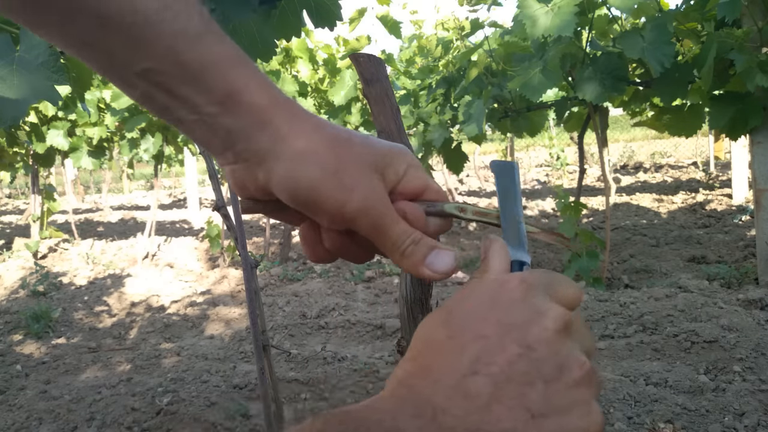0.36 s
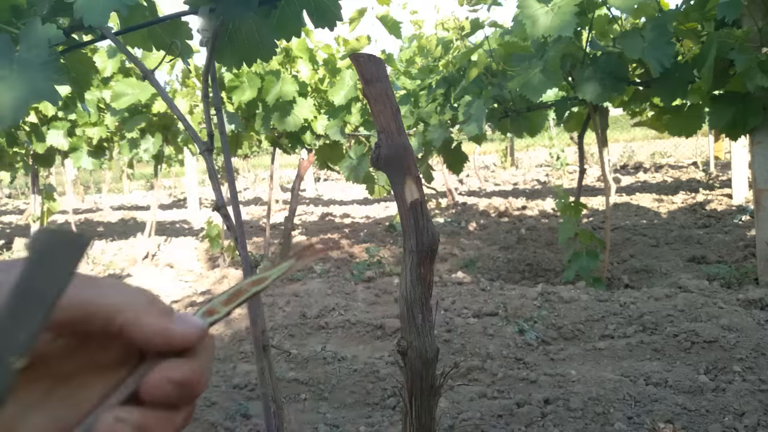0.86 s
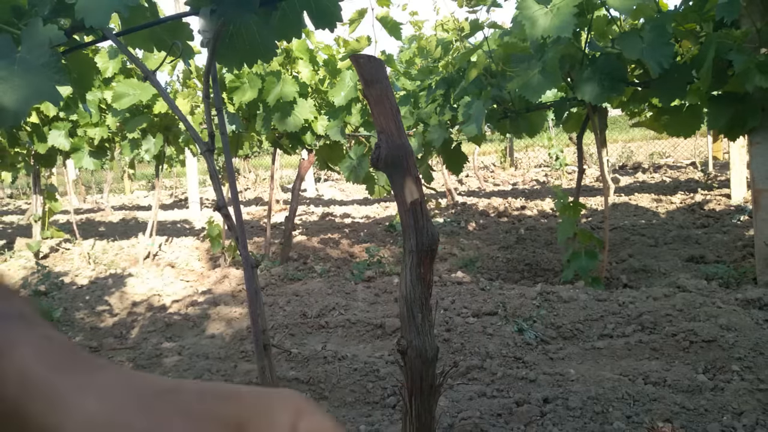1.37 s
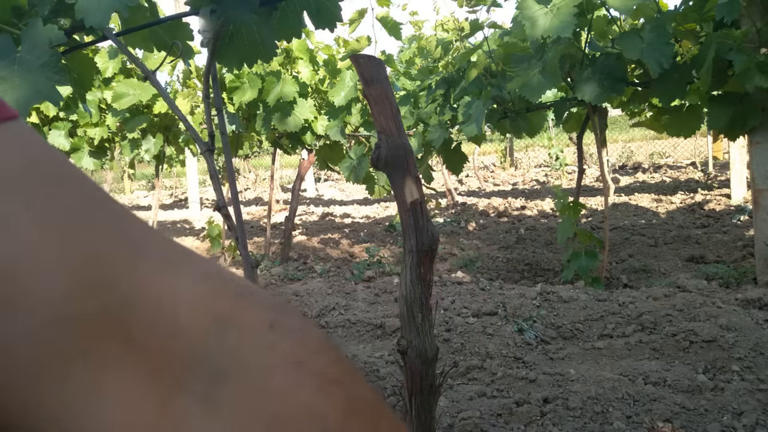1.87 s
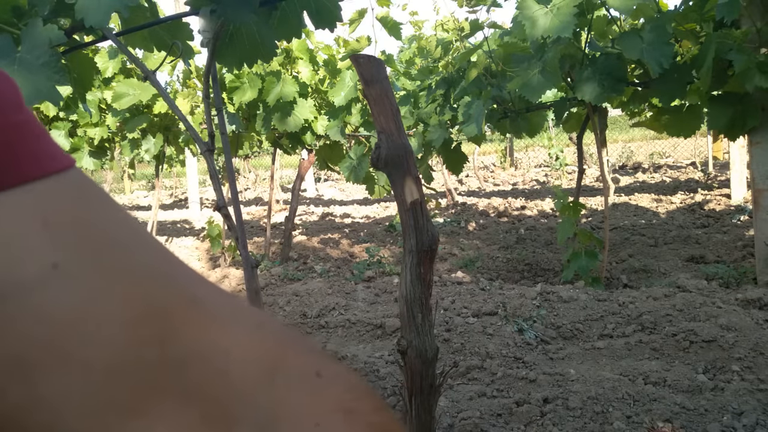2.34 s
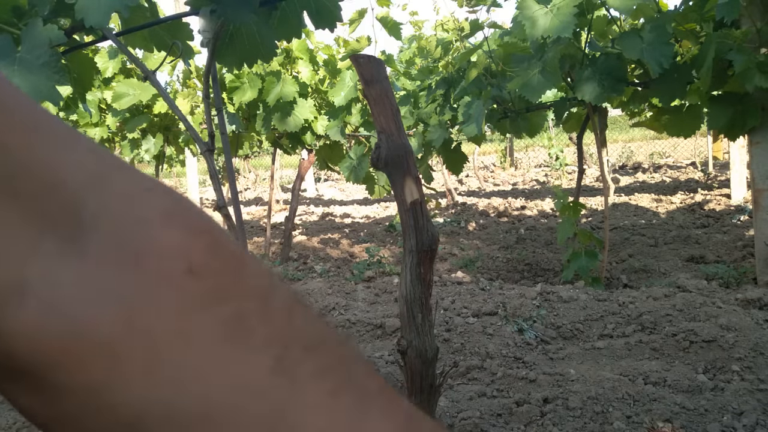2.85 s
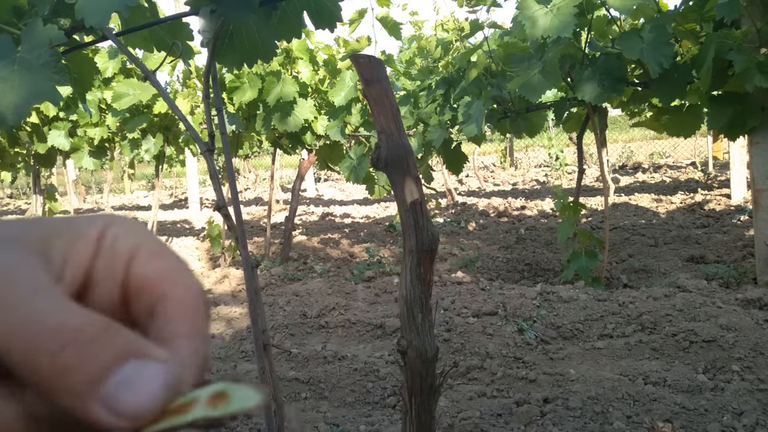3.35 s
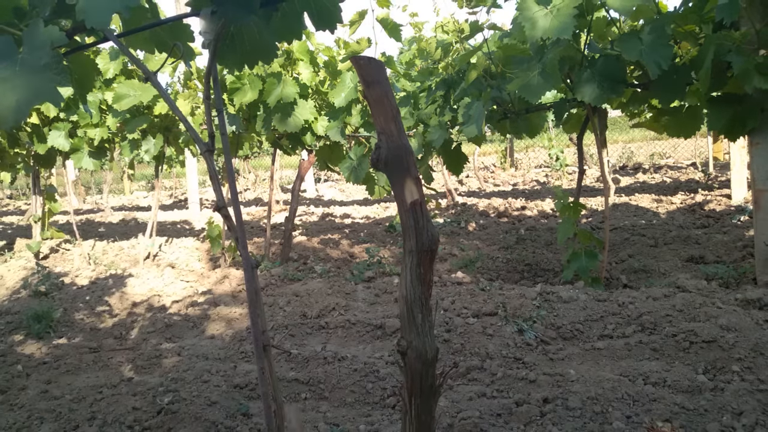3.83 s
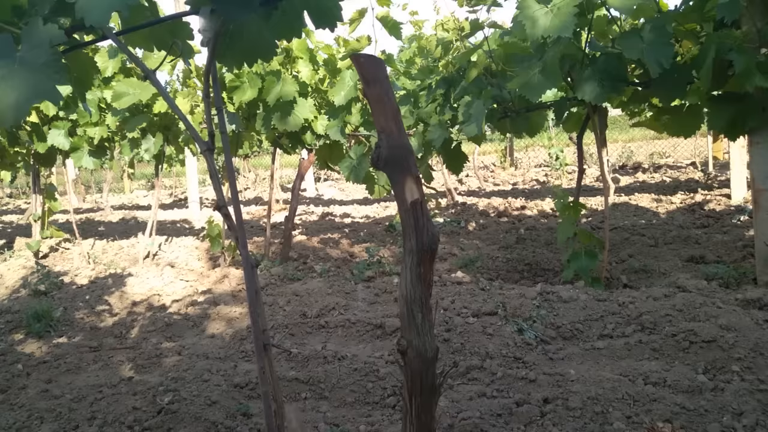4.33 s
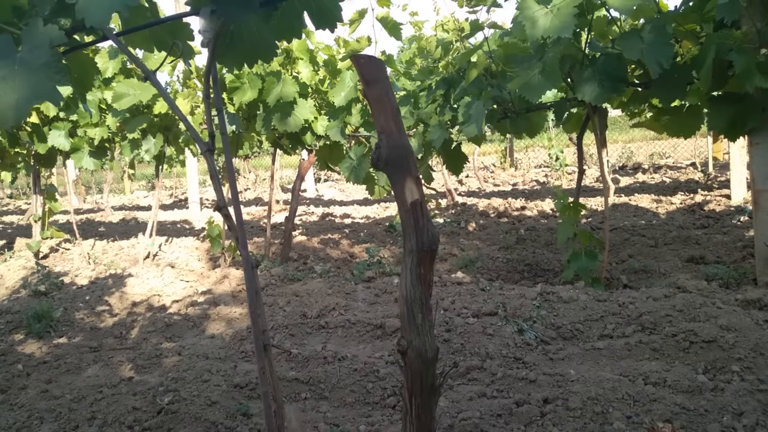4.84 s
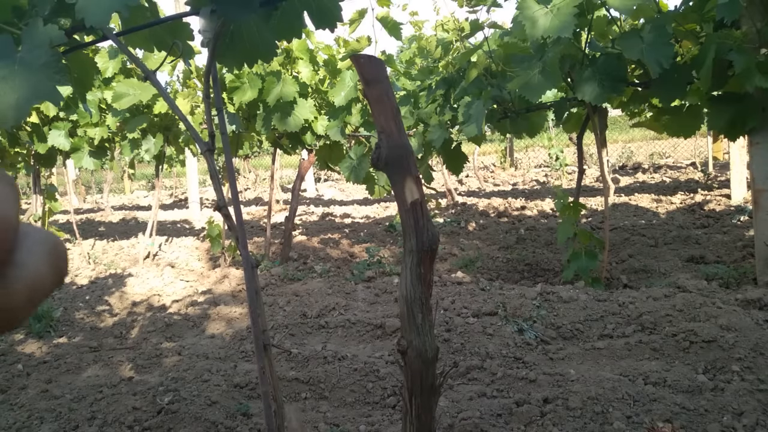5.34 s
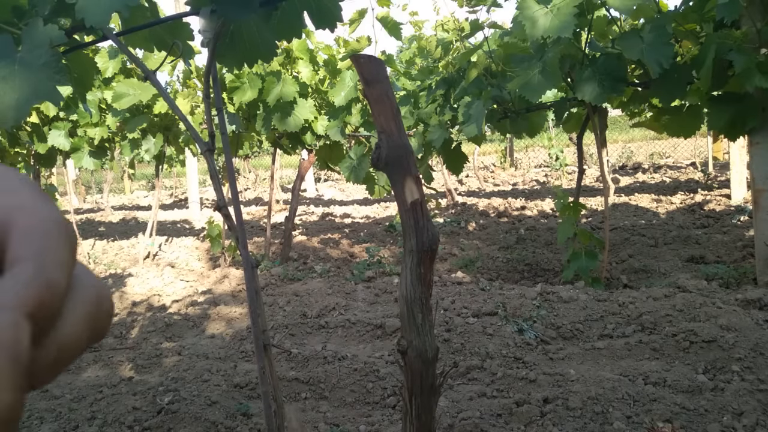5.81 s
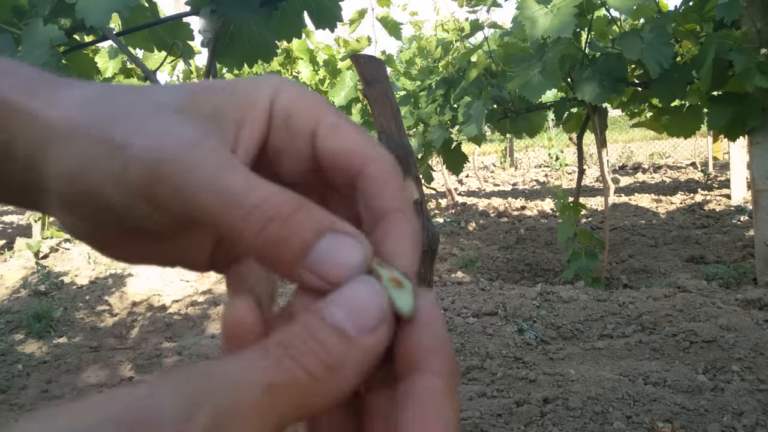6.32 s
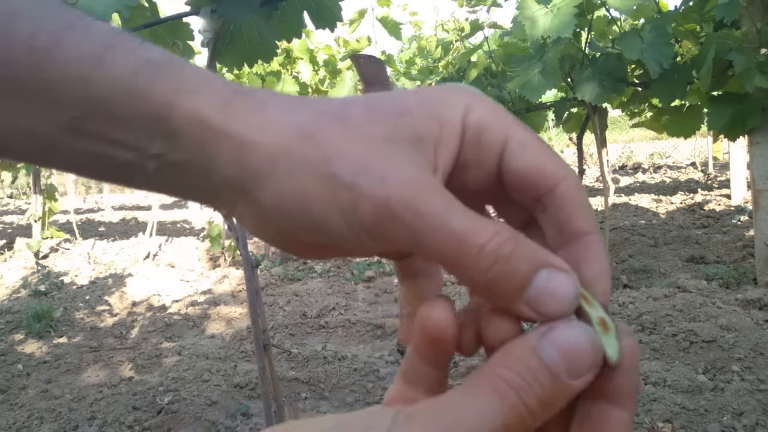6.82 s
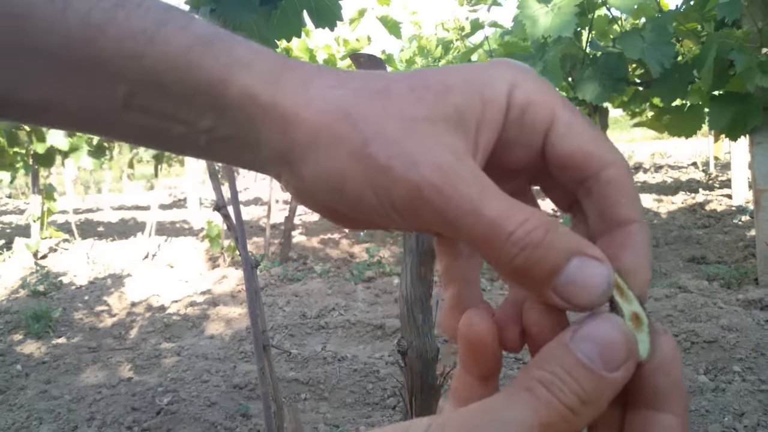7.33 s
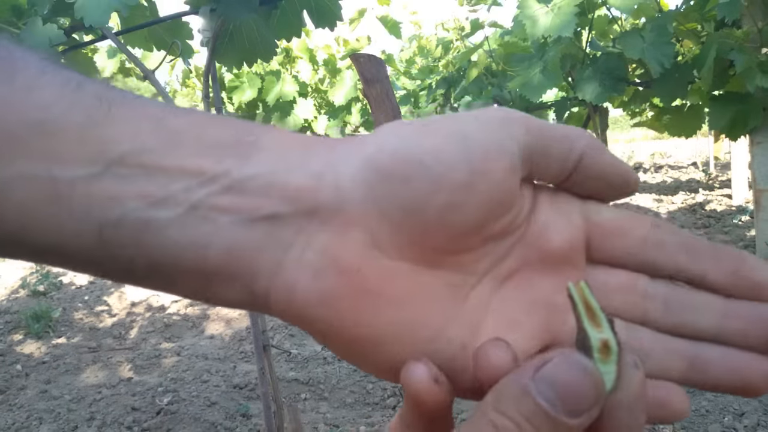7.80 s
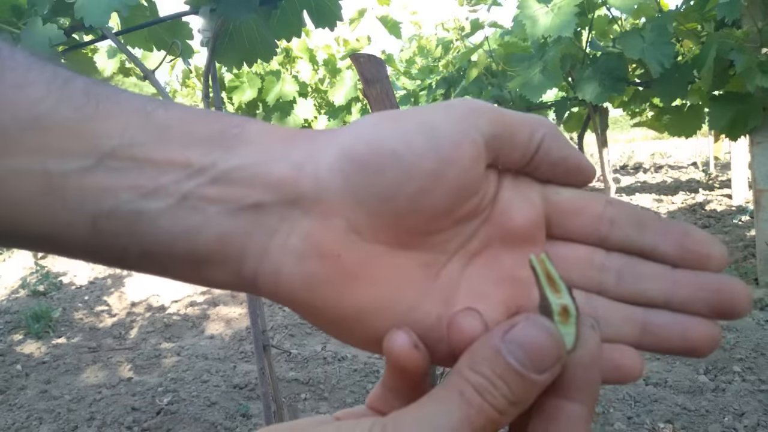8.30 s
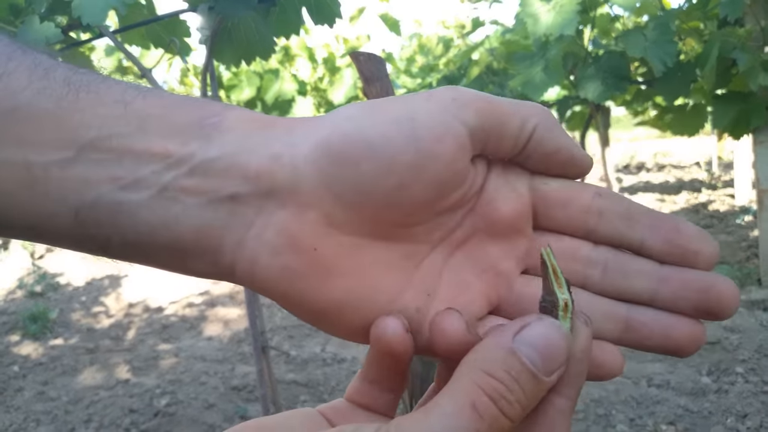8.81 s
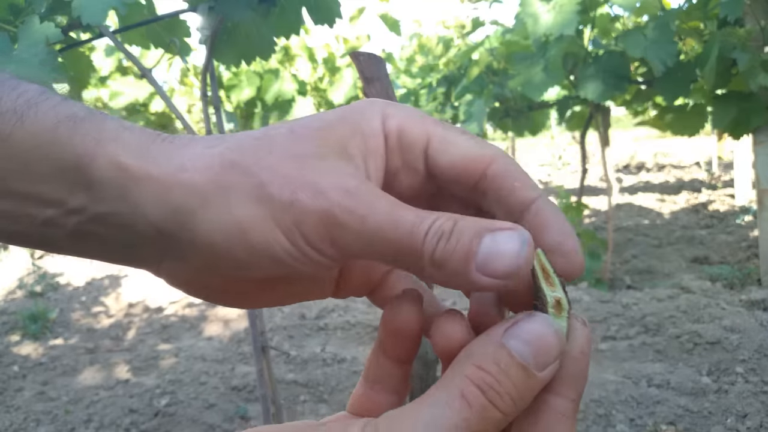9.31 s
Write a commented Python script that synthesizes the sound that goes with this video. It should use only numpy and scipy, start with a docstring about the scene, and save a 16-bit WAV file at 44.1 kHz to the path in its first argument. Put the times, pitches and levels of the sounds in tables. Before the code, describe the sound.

A quiet vineyard in light air with low rumble. A sharp small snap and light tap open it as hands trim a cane. A distant dove repeats soft hoots, a pigeon clucks and purrs, small birds whistle thinly. From about 3.4 to 4.4 seconds the camera is knocked and dragged, loud and close with hard clacks and grit. Then birds alone continue, with one tiny late snap.

```python
"""A quiet vineyard: wind and distant rumble are shaped noise, and a faint cricket is pulsed noise.
Small birds whistle in gliding sines; a far dove hoots in pure tones, and a sparrow chirps in a fluttering one.
A pigeon nearby clucks and purrs in bell-shaped puffs of a low tone. Hands trim a cane beside the camera in
grainy noise and snaps, then something knocks and drags on its mount, ringing a set of decaying modes."""
import sys
import numpy as np
from scipy import signal
from scipy.fft import rfft, irfft, next_fast_len
from scipy.io import wavfile
from scipy.ndimage import uniform_filter1d

SR = 44100
rng = np.random.default_rng(int(sys.argv[2]) if len(sys.argv) > 2 else 0)


def generate_wav(sig):
    """Save sig (samples, or channels by samples) to the path in sys.argv[1] as 16-bit PCM at SR."""
    pcm = np.round(np.clip(np.atleast_2d(sig).T, -1, 1) * 32767).astype(np.int16)
    wavfile.write(sys.argv[1], SR, pcm)


def natural_amplitude(level_db):
    """Convert a level in decibels to a linear amplitude factor, elementwise."""
    exponent = np.asarray(level_db, float) / 20
    return 10 ** exponent


N = 415422
T = np.arange(N) / SR
SIDES = np.array([[1], [-1]])  # left, right

# Spectrum of the air. Each row: frequency in Hz, relative level in dB per Hz.
AIR_SPECTRUM = [(8.8, -25.5), (15, 6.5), (34, -10), (97, -21), (134, -24.5), (220, -29.5), (247, -29.5),
                (483, -32.5), (527, -34), (917, -48.5), (1850, -60.5), (4700, -62), (16000, -73.5)]
AIR_DB = -47.5  # rms before the gusts, flicker and breeze
# Correlation of the air between the sides. Each row: frequency in Hz, correlation of left and right.
AIR_CORRELATION = [(60, 0.14), (130, 0.5), (290, 0.7), (640, 0.2), (1410, -0.12), (3100, 0.04), (6820, 0),
                   (15000, 1)]
# Balance of the air. Each row: frequency in Hz, left minus right in dB.
AIR_BALANCE = [(60, 0.5), (110, -2.0), (200, -3), (380, -2), (700, 1), (1290, -1), (2380, -1), (4400, 1.5),
               (8120, -0.5), (15000, -2)]
# Breeze in the leaves, used relative to its mean. Each row: time in seconds, level in dB.
BREEZE = [(0, -88), (0.6, -94), (0.85, -87), (2.4, -92.5), (5.6, -92.5), (6.4, -86.5), (7.1, -93),
          (9.42, -92.5)]

# Gliding whistles of small far birds. Each row: start in seconds, length in seconds, first pitch in Hz,
# last pitch in Hz, relative level in dB.
WHISTLES = [(0.154, 0.12, 4400, 4180, -84.5), (0.781, 0.022, 4460, 3830, -60.5),
            (1.343, .06, 3880, 2850, -75), (1.35, .045, 4500, 6000, -86), (1.472, 0.043, 4200, 3430, -87),
            (2.25, .04, 4750, 4210, -86), (2.28, 0.1, 4150, 4080, -75), (2.44, 0.042, 4000, 3270, -86),
            (2.508, .04, 4850, 4750, -90), (2.563, .022, 4450, 4350, -86), (2.61, .04, 4400, 2900, -87),
            (2.938, .016, 4830, 5600, -85), (2.955, .022, 4550, 4100, -81), (3.002, .016, 3900, 4470, -80),
            (3.016, 0.02, 4400, 2900, -79), (3.14, .06, 3000, 3300, -93), (3.258, 0.093, 4150, 4000, -79.5),
            (3.38, 0.053, 4100, 3970, -64), (3.77, 0.031, 3910, 3920, -87),
            (4.78, 0.063, 4140, 3254, -81.5), (4.88, .03, 4860, 4570, -80),
            (4.921, 0.036, 3800, 3610, -78.5), (4.957, 0.028, 4800, 3520, -69.5),
            (5.5, 0.078, 4240, 3920, -85), (6.0, .06, 3800, 3230, -89), (6.1, .04, 4200, 4590, -89),
            (6.118, .018, 4910, 5600, -86), (6.142, .025, 4600, 4210, -74),
            (6.181, 0.049, 4166, 3610, -65.5), (6.241, .035, 3210, 2890, -85),
            (6.275, .025, 4900, 5220, -88), (6.301, .02, 4000, 3500, -93), (6.375, .025, 3900, 3000, -87.5),
            (6.39, .015, 4800, 5000, -88.5), (6.415, 0.0299, 4500, 5200, -86),
            (6.439, 0.026, 4000, 3450, -82), (6.73, .06, 5000, 5250, -93), (6.83, .05, 4100, 4600, -84.5),
            (6.858, 0.029, 3720, 3630, -79), (6.889, 0.13, 4020, 3900, -80),
            (6.995, 0.019, 3700, 3100, -84.5), (7.239, .025, 4790, 3600, -87),
            (7.43, .04, 4600, 3040, -87.5), (7.639, 0.057, 4274, 3290, -85), (7.92, .12, 3750, 4440, -87.5),
            (8.037, .03, 4460, 3700, -92), (8.11, 0.18, 4400, 3590, -88.5), (8.209, .09, 3310, 2900, -91.5),
            (9.045, .018, 4300, 4900, -90), (9.062, .03, 4200, 3250, -84), (9.103, .018, 3500, 4000, -86),
            (9.122, .025, 3780, 3130, -86), (9.177, 0.038, 4050, 3580, -75)]
WHISTLE_RISE, WHISTLE_EDGE_DB = 0.25, -6.5  # share of a whistle spent swelling; level at its ends

# Notes of the far dove's phrase. Each row: seconds from its start, length in seconds, first pitch in Hz,
# last pitch in Hz, relative level in dB.
HOOT_PHRASE = [(0, 0.26, 524, 512.7, -0.5), (.35, 0.2, 514, 510, -1), (.54, 0.18, 514, 494, 1),
               (1.13, .15, 525, 491, 0.5)]
# Repeats of the phrase. Each row: start in seconds, level in dB.
HOOT_REPEATS = [(0.2, -70.5), (1.9, -71.5), (3.6, -69.5), (5.31, -68), (7.03, -72.5), (8.74, -76)]
HOOT_RISE, HOOT_EDGE_DB = 0.4, -7  # share of a note spent swelling; level at its ends

# Sparrow's chirps. Each row: start in seconds, level in dB.
CHIRPS = [(3.501, -53.5), (5.275, -54), (7.727, -53.5)]
# Rising and falling strokes of a chirp. Each row: seconds from its start, mean pitch in Hz, relative level in dB.
CHIRP_SHAPE = [(0, 2687, -26), (.025, 4150, -5.5), (.04, 3305, -3.5), (.07, 3150, -10), (.08, 3307, 4),
               (.092, 3994, -3.5), (.105, 3250, 3.5), (.114, 2402, -7), (.124, 2580, -22)]

# Pigeon's single clucks. Each row: start in seconds, level in dB, pitch in Hz.
CLUCKS = [(0.39, -51, 296), (0.588, -47, 340), (1.787, -47.5, 361), (4.987, -51.5, 344), (5.143, -50, 352),
          (6.164, -53.5, 268.4), (6.352, -52.5, 351), (7.844, -51, 339.5), (9.116, -57.5, 353)]
# Pigeon's purrs. Each row: start in seconds, length in seconds, relative level in dB, first mean pitch in Hz,
# last mean pitch in Hz.
PURRS = [(0.699, .185, -49.5, 316, 302), (1.889, .37, -56, 351.7, 264.8), (5.26, 0.21, -55.5, 335, 270.3),
         (6.44, 0.3366, -51, 303, 274.4), (7.96, 0.38, -54, 326, 257.8)]
PURR_SAG_DB, PURR_RELEASE_S = -5.5, 0.0454  # a purr weakens as the crop empties
FIRST_GAP_S, SETTLED_GAP_S, UNEVEN = 0.039, 0.022, 0.13  # mean gaps between throbs, relative irregularity
THROB_GLIDE_PER_S = 8  # relative rise of pitch within one throb
PUFF_S, PUFF_SPREAD_S = 0.0047, 0.00015  # half-width of a puff, growth from throb to throb

# Skin, bark and cloth rubbing. Each row: start in seconds, swell in seconds, hold in seconds, fade in seconds,
# relative level in dB.
RUBS = [(0.048, 0.0071, 0.0025, .05, -46), (0.13, 0.014, .005, .02, -77.5), (0.573, .06, .16, .04, -63.5),
        (0.824, .005, 0.036, .015, -78), (1.412, 0.017, 0.026, .06, -68), (1.556, .02, 0.042, .008, -73),
        (2.743, 0.06, 0.0072, .01, -64.5), (2.827, 0.0088, 0.013, .028, -63.5),
        (3.301, 0.016, .146, .012, -67.5), (3.492, 0.017, .12, .04, -68), (3.8, 0.0013, .002, .018, -29),
        (3.835, 0.0036, .003, .012, -29), (3.849, 0.0037, .06, .1, -41.5), (4.049, 0.0012, .002, .028, -40),
        (4.083, 0.0031, .002, .018, -29), (4.103, 0.0046, .005, .018, -32.5),
        (4.125, .005, .07, .01, -63.5), (4.197, 0.0072, .01, .05, -54), (4.23, .005, .08, 0.022, -64),
        (4.949, 0.027, .003, .016, -74.5), (6.163, 0.053, .02, .008, -77.5),
        (6.846, 0.032, .005, .022, -71.5)]
# Spectrum of the rubbing. Each row: frequency in Hz, relative level in dB per Hz.
RUB_SPECTRUM = [(470, -33.5), (800, -7), (1110, -17), (1350, -16.5), (1540, -10.5), (2870, -6.5),
                (3880, -4.5), (6020, -12.5), (8440, -2.5), (14500, -36), (16000, -28)]
RUB_EDGE_DB = -33  # relative level where a rub starts and ends
# Snaps of fibre and grit. Each row: start in seconds, level in dB, centre in Hz, left minus right in dB,
# fade time constant in seconds.
SNAPS = [(0.048, -31.5, 8330, 2, 0.0013), (0.1513, -52, 2980, -1, 0.0049), (0.3405, -51.5, 5600, 6, 0.0032),
         (0.386, -61, 1770, 3, 0.0019), (0.5881, -65, 3310, -9, 0.0018), (0.9117, -57.5, 3370, -4, 0.0029),
         (0.9997, -61, 2620, -1.5, 0.0027), (1.326, -61, 1900, 1, 0.0028), (1.3578, -59, 3740, 4, 0.0039),
         (1.4244, -48, 9530, 1, 0.0016), (1.582, -55, 6090, -3, 0.0015), (1.642, -63, 2730, -3.0, 0.0021),
         (3.6876, -50.5, 7610, 1, 0.0028), (3.9664, -48, 3320, 11, 0.002), (3.9816, -32, 2870, 3.5, 0.0053),
         (4.9581, -68, 4710, 1.0, 0.002), (5.0064, -60, 6800, -9, 0.0026), (8.6373, -52, 2510, -5, 0.0066),
         (8.639, -59, 9000, -7, 0.003)]

# Knocks on the mount. Each row: start in seconds, level in dB, crack relative to the ring in dB,
# crack frequency in Hz, added left minus right in dB.
KNOCKS = [(0.053, -43, -15, 8320, 3), (0.071, -45, -26, 3030, 6), (0.232, -49.5, -7, 3800, 6),
          (2.727, -54.5, -5, 2860, 13), (2.831, -48.5, 5, 4360, -2), (3.317, -42.5, -34, 3590, 1.5),
          (3.375, -26, -14.5, 2750, .5), (3.405, -26, -18, 3700, 2), (3.424, -23, -32, 1500, 1.5),
          (3.445, -13, -28, 2100, 1), (3.491, -9, -14.5, 1610, 2.5), (3.521, -23, -15.5, 4150, 2.5),
          (3.534, -23.5, -5.5, 2680, 2), (3.56, -22.5, -24, 3400, 1), (3.579, -29.5, -18, 3850, 9.5),
          (3.727, -46.5, -29, 1497, 6.5), (3.8, -6, -17.5, 8900, 3), (3.824, -11, -8.5, 1489, 3.5),
          (3.837, -7, -11.5, 6540, 1.5), (3.868, -17, -14, 8780, 1), (3.908, -15, -11, 8714, 3),
          (3.938, -10, -12, 1906, 1), (3.956, -17.5, -29, 1700, -0.5), (4.004, -30.5, -23, 3120, 1),
          (4.053, 1.5, -16.5, 1498, 3), (4.071, -13, -20.5, 1503, -2), (4.085, -1.5, -28, 9227, 4),
          (4.107, -5.5, -12, 1826, -2), (4.137, -20.5, -29.5, 1700, 8.5), (4.166, -13, -27, 1500, -10.5),
          (4.184, -20.5, -20, 1478, 1.5), (4.205, -20, -1, 3010, 5), (4.23, -16.5, -6, 3000, 4)]
# Modes of the mount. Each row: mean frequency in Hz, mean relative level in dB, 60 dB decay in seconds.
MOUNT_MODES = [(390, -10.5, 0.21), (389, -6, 0.084), (424, -0.5, 0.11), (500, -2.5, 0.21),
               (544.4, -5.5, 0.092), (613, -0.5, 0.055), (700, -6, 0.076), (765, -9, 0.071),
               (870, -6, 0.076), (1004, -6.5, 0.053), (1237, -10, 0.03), (1385, -17.5, 0.076),
               (1850, -15.5, 0.025), (2100, -30.5, 0.09), (2870, -27.5, .03)]
# Soft low modes of its legs. Each row: mean frequency in Hz, mean relative level in dB, 60 dB decay in seconds.
LEG_MODES = [(65, -1, 0.21), (107, 1.5, 0.17), (185, -1, 0.085), (252.6, -0.5, 0.024)]
THUD_DB, THUD_GROWTH = -28.5, 0.4  # thud of a 0 dB knock; dB of thud per dB of knock
# Single decaying tones in some jolts: leg rings and one slow swing. Each row: start in seconds,
# initial level in dB, frequency in Hz, 60 dB decay in seconds.
JOLTS = [(0.053, -37.5, 60, .1), (0.057, -39.5, 230, 0.072), (3.8, -12.5, 245, 0.084),
         (3.802, -24, 11, 0.72), (3.812, -20, 150, 0.1), (3.831, -24, 105, .12), (4.168, -26, 60, .2)]
# Force of the dragging, one list a span. Each row: time in seconds, level in dB.
DRAG = [
    [(2.72, -59.5), (2.88, -65)],
    [(3.3, -71), (3.5, -50.5), (3.76, -70.5)],
    [(3.8, -54), (3.97, -37.5), (4.12, -36), (4.21, -42), (4.29, -42.5), (4.33, -51), (4.42, -65.5)],
]
SHAKE_DB, SCRAPE_DB = -10, -17  # low shaking and crackling scrape, relative to the ringing grit


def unit(x):
    """Normalisation: scale to rms 1."""
    return x / np.sqrt(np.mean(x ** 2))


def curve(tables, column, silent=None):
    """Linear interpolation of one column: joined straight across the gaps, or silent between spans."""
    if silent is None:
        rows = np.concatenate(tables)
        return np.interp(T, rows[:, 0], rows[:, column])
    spans = [np.array(rows)[:, [0, column]].T for rows in tables]
    return np.max([np.interp(T, *span, left=silent, right=silent) for span in spans], axis=0)


def gain(tables, column, edge_s=0.004):
    """Amplitude envelope: a level column in dB as a gain with soft edges."""
    return uniform_filter1d(natural_amplitude(curve(tables, column, silent=-200)), max(int(edge_s * SR), 1))


def shape(x, points):
    """Spectral weighting by (Hz, dB) points joined along log frequency."""
    hz, db = np.transpose(points)
    size = next_fast_len(N)
    f = np.maximum(np.arange(size // 2 + 1) * SR / size, 1)
    weight = natural_amplitude(np.interp(np.log(f), np.log(hz), db))
    return irfft(rfft(x, size) * weight, size)[..., :N]


def band(x, lo_hz, hi_hz):
    """Band-pass filtering by a Butterworth filter."""
    sos = signal.butter(2, [lo_hz, min(hi_hz, 0.45 * SR)], "band", fs=SR, output="sos")
    return signal.sosfilt(sos, x)


def walk(rate):
    """Slow random modulation: levels held 1 / rate s and slewed twice; spread near 1."""
    k = int(SR / rate)
    held = np.repeat(rng.standard_normal(N // k + 1), k)
    return 1.6 * uniform_filter1d(uniform_filter1d(held, k), k)[:N]


def ring(x, hz, t60):
    """Resonance: the response of one exponentially decaying mode."""
    pole = np.exp(2j * np.pi * hz / SR - np.log(1000) / (t60 * SR))
    return signal.lfilter([1], [1, -pole], x).imag


def tone(hz):
    """Phase is the integral of frequency: a sine of rms 1 on a moving pitch."""
    return np.sqrt(2) * np.sin(2 * np.pi * np.cumsum(hz) / SR)


def pair(wide):
    """Partial coherence: left and right noise from a shared and an opposed part."""
    mid, side = rng.standard_normal((2, N))
    return (mid + wide * side * SIDES) / np.sqrt(1 + wide ** 2)


def leaves(x, wet_db, t60):
    """Multiple scattering from the vine rows: a short noisy tail, different on each side."""
    t = np.arange(int(t60 * SR)) / SR
    noise = rng.standard_normal((2, int(0.5 * SR)))[:, :len(t)]
    tail = noise * 1000 ** (-t / t60) * (t > 0.004)
    tail = tail / np.sqrt(np.sum(tail ** 2) / 2)
    return x + natural_amplitude(wet_db) * signal.fftconvolve(x * np.ones((2, 1)), tail, axes=1)[:, :N]


def note(s, length, first_hz, last_hz, db, rise, edge_db):
    """Evenly gliding call that swells and dies: rows (s, Hz, dB)."""
    corners = ((0, edge_db), (np.clip(rise, 0.05, 0.95), 0), (1, edge_db))
    return [(s + share * length, first_hz + share * (last_hz - first_hz), db + drop)
            for share, drop in corners]


def air():
    """Partly coherent noise: steady rumble, bass in gusts stronger on the right, treble following the breeze."""
    # the shared part has power 1 + correlation, the opposed part 1 - correlation
    mid, side = (shape(rng.standard_normal(N),
                       [(hz, 10 * np.log10(1 + sign * np.clip(c, 0, 0.99))) for hz, c in AIR_CORRELATION])
                 for sign in (1, -1))
    both = [shape(mid + sign * side, [(hz, sign * db / 2) for hz, db in AIR_BALANCE]) for sign in (1, -1)]
    whole = natural_amplitude(AIR_DB) * unit(shape(np.array(both), AIR_SPECTRUM))
    bass = shape(whole, [(50, 0), (100, -60)])
    treble = shape(whole, [(500, -60), (1200, 0), (4500, 0), (9000, -60)])
    breeze_db = curve([BREEZE], 1)
    gust = natural_amplitude(1.3 * walk(1.5) + 2.2 * walk(6))
    flicker = natural_amplitude(0.9 * walk(8))
    middle = (whole - bass - treble) * flicker
    return middle + bass * gust * natural_amplitude(-1.5 * SIDES) + treble * natural_amplitude(breeze_db - np.mean(breeze_db))


def cricket():
    """Amplitude-modulated band noise: buzzes near 4.6 kHz about three times a second, coming and going."""
    on = np.sin(2 * np.pi * (2.9 * T + 0.3)) > 0.3 * walk(4)
    buzz = on * np.sin(np.pi * 45 * T) ** 2  # 45 pulses a second
    return natural_amplitude(-91.5 + 2.5 * walk(1.5)) * buzz * unit(band(pair(0.6), 4500, 4800))


def twitter():
    """Frequency glides: thin whistles, blurred by distance, over a scatter of mostly fainter steep peeps."""
    near = np.zeros(N)
    blur = natural_amplitude(4.5 * walk(120))
    bend = 1 + 0.012 * walk(200) + 0.01 * walk(70)
    for row in WHISTLES:
        s, hz, db = np.transpose(note(*row, WHISTLE_RISE, WHISTLE_EDGE_DB))
        span = slice(int(s[0] * SR), int(s[-1] * SR))
        t = T[span]
        level = signal.windows.tukey(len(t), 0.2) * natural_amplitude(np.interp(t, s, db)) * blur[span]
        near[span] += level * tone(np.interp(t, s, hz) * bend[span])
    far, t = np.zeros(N), T[:1100]
    for when, pitch, glide, size in rng.random((150, 4)):
        i = int(when * (N - len(t)))
        hz = (3400 + 2200 * pitch) * (1 - 16 * (glide - 0.2) * t)  # most fall, some rise
        peep = np.sin(np.pi * t / t[-1]) * np.sin(2 * np.pi * np.cumsum(hz) / SR)
        far[i:i + len(t)] += natural_amplitude(-97 + 12 * size) * peep
    return leaves(near + far, -1.5, 0.1)


def dove():
    """Pure tones in a repeated phrase of hoots, their level wavering a little in the air on the way."""
    hoots = [note(start + s, length, a, b, level_db + db, HOOT_RISE, HOOT_EDGE_DB)
             for start, level_db in HOOT_REPEATS for s, length, a, b, db in HOOT_PHRASE]
    waver = natural_amplitude(1.2 * walk(15))
    return leaves(gain(hoots, 2, edge_s=0.035) * waver * tone(curve(hoots, 1)), -17.0, 0.15)


def sparrow():
    """Frequency modulation: a fast-fluttering, rough whistle with a rasp of air and overtone, smeared by vines."""
    s, shape_hz, shape_db = np.transpose(CHIRP_SHAPE)
    level, hz = np.zeros(N), np.full(N, shape_hz[0])
    for start, db in CHIRPS:
        inside = (T >= start) & (T < start + s[-1])
        level[inside] = natural_amplitude(db + np.interp(T[inside] - start, s, shape_db))
        hz[inside] = np.interp(T[inside] - start, s, shape_hz)
    hz = hz * (1 + 0.045 * np.sin(2 * np.pi * 170 * T) + 0.025 * walk(350))
    rasp = unit(band(rng.standard_normal(N), 2480, 4000))
    voice = natural_amplitude(3 * walk(300)) * tone(hz) + natural_amplitude(-10) * rasp + natural_amplitude(-34) * tone(2 * hz)
    # the other side of the voice box: higher, weaker, later
    upper = level * natural_amplitude(-17 + 4.4 * walk(200)) * tone(1.2 * hz)
    call = level * voice + np.roll(upper, int(0.03 * SR))
    call = call + natural_amplitude(-5.5) * np.roll(call, int(0.027 * SR))  # one clear echo from something near
    return natural_amplitude(2.2 * SIDES) * leaves(band(call, 1600, 12000), -4, 0.059)


def puff(t, width_s):
    """Gaussian pulse: the envelope of one pulse of the inflated crop, peak 1."""
    return np.exp(-0.5 * ((t - 0.008) / width_s) ** 2)


def pigeon():
    """Pulsed low tone: each cluck is one puff; a purr is a string of widening puffs that close up and blur."""
    clucks = sum(natural_amplitude(db) * puff(T - s, PUFF_S) * np.sin(2 * np.pi * hz * (T - s)) for s, db, hz in CLUCKS)
    throbs, age_s = np.zeros((2, N))
    speeding = np.exp(-np.arange(30) / 1.1)  # 1 at the first throb, 0 once settled
    for (start, length, *_), chance in zip(PURRS, rng.standard_normal((len(PURRS), 2, 30))):
        uneven = UNEVEN * (1 - speeding)
        gaps = SETTLED_GAP_S * (1 + uneven * np.clip(chance[0], -2, 2))
        gaps = gaps + (FIRST_GAP_S - SETTLED_GAP_S) * speeding
        times = start + 0.003 + np.cumsum(gaps) - gaps
        sizes = natural_amplitude(15 * uneven * chance[1])
        for k, (s, size) in enumerate(zip(times, sizes)):
            if s < start + length + PURR_RELEASE_S:
                throbs += size * puff(T - s, PUFF_S + k * PUFF_SPREAD_S)
                age_s[int(s * SR):int(s * SR) + 2000] = T[:2000] - SETTLED_GAP_S / 2
    wobble = 1 + 0.035 * walk(60) + THROB_GLIDE_PER_S * age_s
    purrs = [[(s, db, a), (s + length, db + PURR_SAG_DB, b), (s + length + PURR_RELEASE_S, db - 26.5, b)]
             for s, length, db, a, b in PURRS]
    purring = natural_amplitude(2.5) * gain(purrs, 1, edge_s=0.0022) * throbs * tone(curve(purrs, 2) * wobble)
    return leaves(clucks + purring, -5.5, 0.11) * natural_amplitude(0.78 * SIDES)


def hands():
    """Friction and fracture: grainy rubbing hiss, and single snaps of decaying band noise."""
    grain = natural_amplitude(2.3 * walk(280) + walk(70))
    rubs = [np.c_[s + np.cumsum([0, swell, hold, fade]), db + RUB_EDGE_DB * np.array([1, 0, 0, 1])]
            for s, swell, hold, fade, db in RUBS]
    hiss = unit(shape(pair(0.86) * grain, RUB_SPECTRUM))
    out = gain(rubs, 1, edge_s=0.00054) * natural_amplitude(5.5) * hiss
    chance = rng.standard_normal((len(SNAPS), 2, 900))
    for (s, db, hz, pan_db, fade_s), (mid, side) in zip(SNAPS, chance):
        burst = (mid + 0.5 * side * SIDES) * np.exp(-T[:900] / max(fade_s, 2e-4))
        snap = band(burst, hz / 1.5, hz * 1.5)
        out[:, int(s * SR):int(s * SR) + 900] += natural_amplitude(db + pan_db / 2 * SIDES) * snap / np.abs(snap).max()
    return out


def strike(modes, chance, soft_s):
    """Modal excitation: a short push rings every mode; high modes move the two ports differently."""
    out = 0
    push = (T[:9000] + 1e-9) * np.exp(-T[:9000] / soft_s)
    for (hz, db, t60), (size, tune, lean) in zip(modes, chance):
        wide = np.clip((hz / 850) ** 2, 0, 1.3) * np.tanh(3 * lean)
        mode = np.sign(tune) * ring(push, hz * (1 + 0.015 * tune), t60)
        out = out + natural_amplitude(db + 4.5 * size) * (1 + wide * SIDES) * mode
    return out / np.abs(out).max()


def mount():
    """Modal resonance: knocks and a gritty drag ring the same modes; knocks also thud in the legs and crack."""
    out = np.zeros((2, N))
    t = T[:9000]
    chance = rng.standard_normal((len(KNOCKS), 2, 9000))
    # the touching hand or soil takes most of the ring at once
    damping = (1 - np.exp(-t / 0.0014)) * (np.exp(-t / 0.0055) + natural_amplitude(-10))
    crack_fade = np.exp(-t / 0.0025) + natural_amplitude(-14.0) * np.exp(-t / 0.017)
    for (s, db, crack_db, crack_hz, pan_db), (mid, side) in zip(KNOCKS, chance):
        blow = damping * strike(MOUNT_MODES, mid[:60].reshape(20, 3), 0.0001)
        thud = strike(LEG_MODES, side[:60].reshape(20, 3), 0.0006)
        crack = band((mid + 0.5 * side * SIDES) * crack_fade, crack_hz / 1.9, crack_hz * 1.1)
        whole = blow / np.abs(blow).max() + natural_amplitude(crack_db) * crack / np.abs(crack).max()
        knock = natural_amplitude(db + pan_db / 2 * SIDES) * whole
        knock = knock + natural_amplitude(THUD_DB + THUD_GROWTH * db - 1.8 * SIDES) * thud
        out[:, int(s * SR):int(s * SR) + 9000] += knock
    for s, db, hz, t60 in JOLTS:
        t = T[:SR // 2]
        decaying = 1000 ** (-t / t60) * np.sin(2 * np.pi * hz * t)
        out[:, int(s * SR):int(s * SR) + len(t)] -= natural_amplitude(db) * decaying
    scrape = unit(band(pair(0.8) * natural_amplitude(8.1 * walk(200)), 1800, 4000))
    grit = unit(sum(natural_amplitude(db) * ring(pair(hz / 900) * natural_amplitude(6 * walk(160)), hz, t60) for hz, db, t60 in MOUNT_MODES))
    shake = unit(band(pair(1.0), 45, 200))
    return out + gain(DRAG, 1) * (grit + natural_amplitude(SHAKE_DB) * shake + natural_amplitude(SCRAPE_DB) * scrape)


def scene():
    """Superposition of all sources at the two microphones."""
    return air() + cricket() + twitter() + dove() + sparrow() + pigeon() + hands() + mount()


def band_limit(x):
    """A steep low-pass at the top of the band."""
    return signal.sosfilt(signal.butter(12, 16500, fs=SR, output="sos"), x)


def record(dry):
    """Soft saturation: the camera rounds the loudest peaks."""
    rounded = np.tanh(1.05 * dry) / 1.05
    return band_limit(rounded)


dry = scene()
out = record(dry)
generate_wav(out)
```